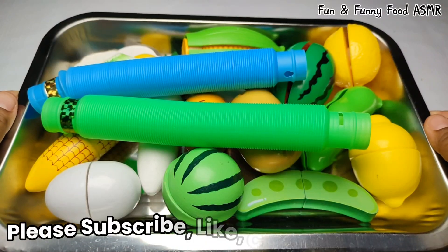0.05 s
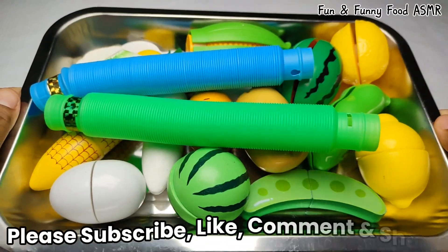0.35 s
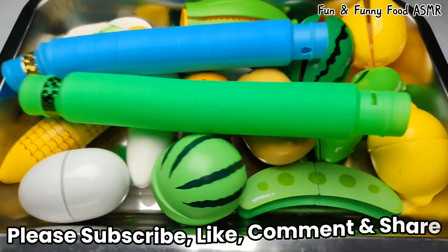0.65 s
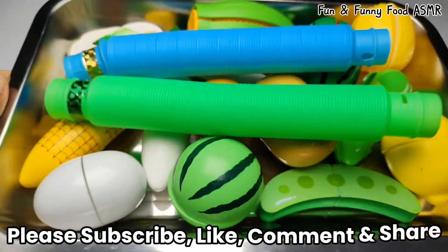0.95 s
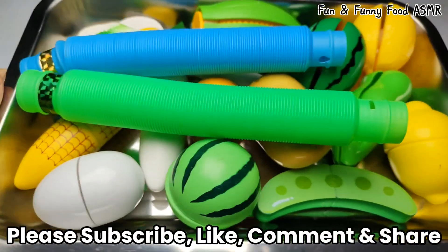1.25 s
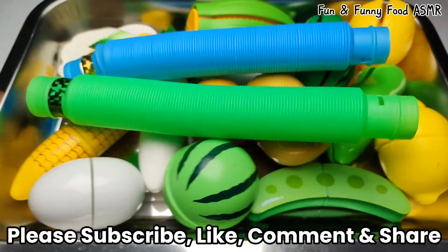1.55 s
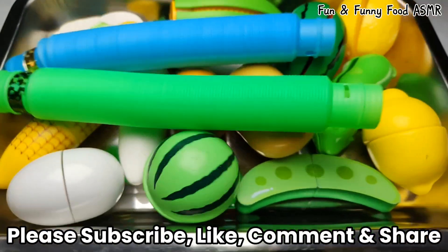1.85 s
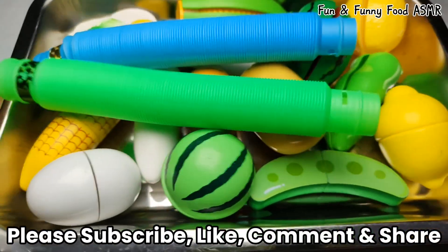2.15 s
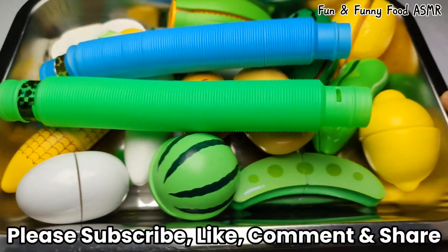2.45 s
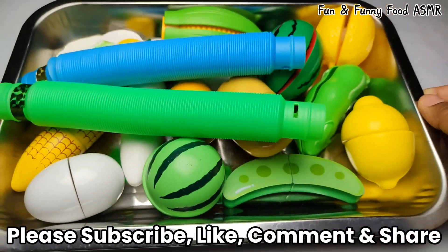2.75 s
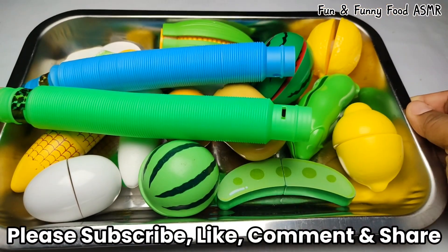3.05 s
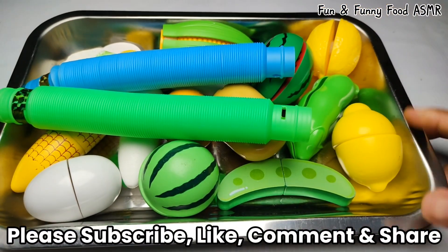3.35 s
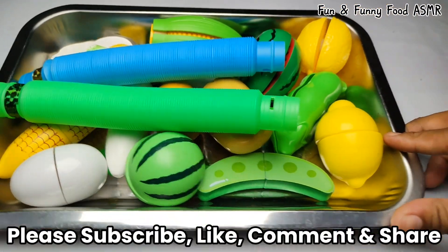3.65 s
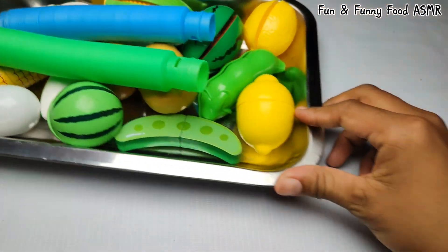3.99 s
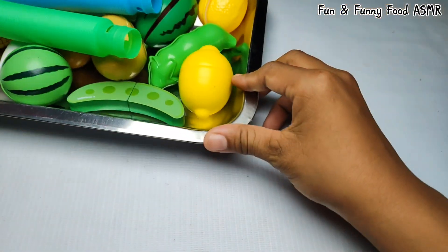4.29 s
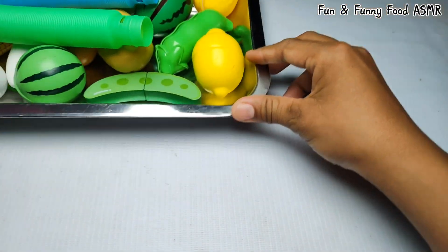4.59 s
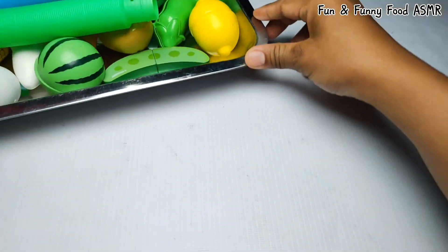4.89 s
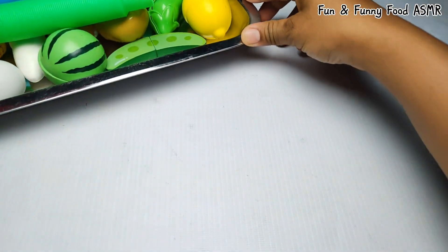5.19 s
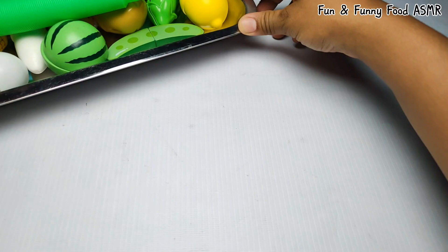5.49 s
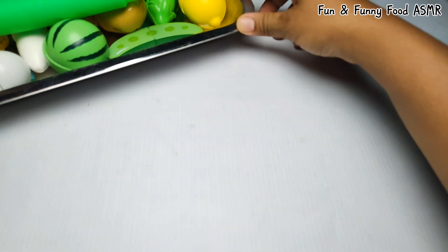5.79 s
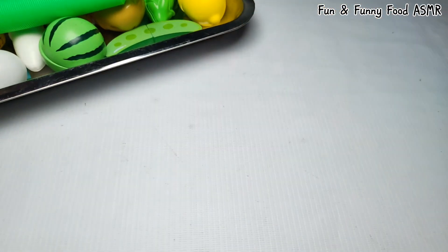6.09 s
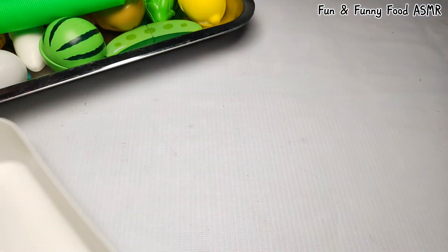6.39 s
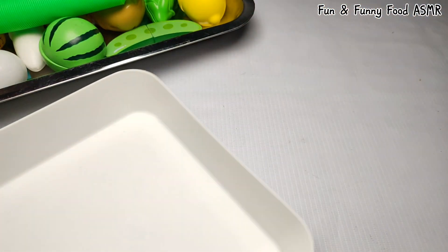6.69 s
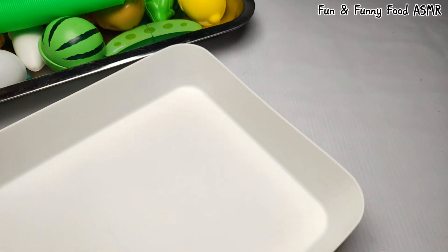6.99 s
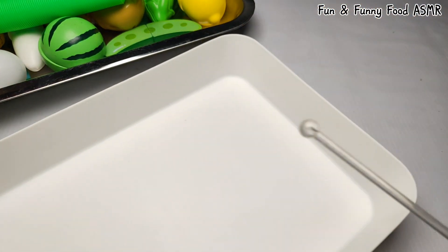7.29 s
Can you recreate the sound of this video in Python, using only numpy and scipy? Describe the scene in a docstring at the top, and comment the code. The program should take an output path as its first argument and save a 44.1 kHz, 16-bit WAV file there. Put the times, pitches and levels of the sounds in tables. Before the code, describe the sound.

Close up in a small room, a heap of hollow plastic toys rattles and clacks against a shaken metal tray. The loud clatter stops and a few soft taps follow. Next the tray scrapes over the tabletop in two pushes, bumping and jogging the toys as it goes. Finally a plastic tray is slid across the table, rasping and groaning quietly over faint background rumble and hiss.

```python
"""Plastic toys in a steel tray

Hollow toys are shaken in a steel tray, close by in a small room, landing in a heap about eight times
a second. Each impact excites the damped modes of a plastic shell and of the steel under it. The toys
settle with a few clicks; the tray is pushed across the table, knocking as it goes, and a plastic tray
slides in after it. Sliding friction makes both scrape; stick-slip makes them sing, rasp and groan."""
import sys
import numpy as np
from scipy import signal
from scipy.fft import rfft, irfft, next_fast_len
from scipy.io import wavfile
from scipy.ndimage import uniform_filter1d

SR = 44100
rng = np.random.default_rng(int(sys.argv[2]) if len(sys.argv) > 2 else 0)


def wav_out(sig):
    """Save sig, one row per channel (or a flat mono array), as 16-bit PCM at SR to the path in sys.argv[1]."""
    wavfile.write(sys.argv[1], SR, np.round(np.clip(np.atleast_2d(sig).T, -1, 1) * 32767).astype(np.int16))


N = 332542
TIME = np.arange(N) / SR
RING_TIME = np.arange(SR // 4) / SR   # time axis of one impulse response


def from_db(db):
    """Amplitude ratio of a level in decibels."""
    return 10 ** (np.asarray(db) / 20)


def rms_one(x):
    """Normalise to unit mean power."""
    return x / np.sqrt(np.mean(x ** 2) + 1e-20)


def energy_one(x):
    """Normalise to unit energy in each channel."""
    return x / np.sqrt(np.sum(x ** 2, axis=-1, keepdims=True))


def peak_one(x):
    """Normalise to unit peak amplitude."""
    return x / np.abs(x).max()


def level_curve(rows):
    """Linear interpolation of (time_s, level_db) rows at every sample."""
    return np.interp(TIME, *np.transpose(rows))


def during(rows):
    """A gate, open while a curve lasts, with 10 ms ramps."""
    return np.clip(np.minimum(TIME - rows[0][0], rows[-1][0] + .02 - TIME) / .01, 0, 1)


def envelope(start_s, hold_s, swell_s, fall_s):
    """Exponential growth up to start_s, a plateau, then exponential decay."""
    exponent = np.minimum((TIME - start_s) / swell_s, (start_s + hold_s - TIME) / fall_s)
    return np.exp(np.clip(exponent, -30, 0))


def onset(rise_s):
    """First-order rise that softens the attack of an impulse response."""
    return 1 - np.exp(-RING_TIME / rise_s)


def on_bins(points, size):
    """Interpolation over log frequency at the bins of a Fourier transform."""
    hz, values = np.transpose(points)
    return np.interp(np.log(np.arange(size // 2 + 1) * SR / size + 1), np.log(hz), values)


def colour(x, spectrum):
    """Minimum-phase filter with a magnitude response of (freq_hz, gain_db) points."""
    size = 2 * next_fast_len(x.shape[-1])
    cepstrum = irfft(np.log(from_db(on_bins(spectrum, size))))[:size // 2]
    response = np.exp(2 * rfft(cepstrum, size) - cepstrum[0])
    return irfft(rfft(x, size) * response)[..., :x.shape[-1]]


def highpass(x, cutoff_hz, order):
    """Butterworth high-pass filter."""
    return signal.sosfilt(signal.butter(order, cutoff_hz, "high", fs=SR, output="sos"), x)


def pan(left_db):
    """Stereo gains for a level difference in favour of the left."""
    return from_db(np.array([[.5], [-.5]]) * left_db)


# Likeness of the sound at left and right: freq_hz, correlation
COHERENCE = [(60, 0.81), (300, 0.93), (640, 0.49), (900, 0.26), (1150, 0.019), (16000, 0.052)]
def spread(pair):
    """Spatial coherence: two independent signals become left and right, alike only in the bass."""
    size = 2 * next_fast_len(pair.shape[-1] // 2 + 2000)
    alike = np.clip(on_bins(COHERENCE, size), -1, 1)
    mid, side = rfft(pair, size)
    return irfft(np.sqrt(1 + alike) * mid + np.sqrt(1 - alike) * side * [[1], [-1]])[:, :pair.shape[-1]]


def drift(per_s):
    """Random fluctuation of unit rms, interpolated between per_s values a second."""
    knots = rng.standard_normal(20000)
    return rms_one(np.interp(TIME * per_s, np.arange(len(knots)), knots))


def wander(per_s, count):
    """Random crossfade among several gains at constant total power."""
    gains = np.array([drift(per_s) for _ in range(count)])
    return gains / np.sqrt(np.sum(gains ** 2, axis=0))


def narrow_noise(hz, width_hz):
    """Narrow-band stereo noise: random quadrature modulation of a carrier whose pitch may move."""
    phase = 2 * np.pi * np.cumsum(hz * np.ones(N)) / SR
    pair = [drift(width_hz) * np.cos(phase) + drift(width_hz) * np.sin(phase) for _ in range(2)]
    return spread(np.array(pair))


def modes(rows):
    """Modal superposition: damped sines (freq_hz, level_db, t60_s), of random strength on each side."""
    out = 0
    for hz, db, t60_s in rows:
        decay = from_db(db + rng.normal(0, 2, (2, 1)) - 60 * RING_TIME / t60_s)
        right_sign = 1 if hz < 1000 else rng.choice([-1, 1])   # low modes reach both sides in phase
        polarity = np.array([[1], [right_sign]]) * rng.choice([-1, 1])
        out += polarity * decay * np.sin(2 * np.pi * hz * RING_TIME)
    return out


def dense_ring(t60_s):
    """High modal overlap: countless modes struck at once merge into decaying noise."""
    return spread(rng.standard_normal((2, len(RING_TIME))) * from_db(-60 * RING_TIME / t60_s))


def contacts(per_s, uneven_db, window_s):
    """Poisson impulses of log-normal size, levelled to unit power over a short window."""
    struck = rng.random(N) < per_s / SR
    clicks = struck * from_db(uneven_db * rng.standard_normal(N)) * rng.choice([-1, 1], N)
    power = np.abs(uniform_filter1d(clicks ** 2, int(window_s * SR)))
    return clicks / np.sqrt(power + 1e-6)


def add(out, start_s, sound):
    """Superpose a sound on the mix at a given time."""
    start = round(start_s * SR)
    out[:, start:start + sound.shape[1]] += sound[:, :N - start]


def excite(force, response):
    """A linear system's output: the excitation convolved with the impulse response."""
    force = np.atleast_2d(force)
    out, active = np.zeros((2, N)), np.flatnonzero(force.any(axis=0))
    if len(active):
        add(out, active[0] / SR, signal.oaconvolve(force[:, active[0]:active[-1] + 1], response, axes=-1))
    return out


# Spectrum of the ambient noise: freq_hz, density_db
AMBIENT_SPECTRUM = [(12, -31.5), (20, -2.5), (72, 2), (182, -20), (310, -18), (607, -32), (802, -25),
                    (1260, -34), (3070, -32.5), (4060, -36.5), (5080, -46.5), (6180, -44.5), (7310, -50),
                    (9400, -47.5), (16000, -74.5)]
# Its dip during the shaking: time_s, gain_db
AMBIENT_DIP = [(0.7, -3), (1.1, -9.5), (2.5, -10.5), (3.1, 0.5)]
# Faint distant glides: start_s, level_db, hold_s, first_hz, last_hz
GLIDES = [(0.155, -50.5, 0.19, 394, 383.5), (0.317, -51, 0.35, 367.6, 305), (3.365, -57.5, 0.21, 807, 708),
          (3.44, -53, 0.11, 520, 510)]
def background():
    """Ambient noise: low rumble and faint hiss, with far tones under slight random modulation."""
    noise = rms_one(colour(spread(rng.standard_normal((2, N))), AMBIENT_SPECTRUM))
    out = from_db(-44.5 + level_curve(AMBIENT_DIP)) * noise
    for start_s, db, hold_s, first_hz, last_hz in GLIDES:
        hz = np.interp(TIME, [start_s, start_s + hold_s], [first_hz, last_hz])
        phase = 2 * np.pi * np.cumsum(hz * (1 + .08 * drift(90))) / SR
        shape = envelope(start_s, hold_s, swell_s=.0175, fall_s=.042)
        out += shape * from_db(db + 2 * drift(32)) * np.sin(phase)
    return out


def room(direct, t60_s=.12, reverb_db=-4.5):
    """Reverberation: near walls return a short tail whose pattern changes as the trays move."""
    walls = [(150, -9.5), (900, -3.5), (4000, -2.0), (14000, 1.0)]   # freq_hz, gain_db
    tails = sum(excite(direct * place, energy_one(colour(dense_ring(t60_s) * onset(.0028), walls)))
                for place in wander(per_s=6, count=4))
    return direct + from_db(reverb_db) * tails


def friction(pushes, steady_db=-40):
    """Amplitude of sliding friction: 1 in a steady push, 0 at rest."""
    return sum(from_db(level_curve(push) - steady_db) * during(push) for push in pushes)


# Spectrum of fine friction hiss: freq_hz, density_db
HISS_SPECTRUM = [(3500, -20), (5500, 3), (6200, 5.5), (7200, -5), (8300, -1.5), (10000, -2), (12500, -10),
                 (15700, -5)]
def slide(pushes, scrape_spectrum, drum_spectrum, scrape_db, hiss_db, drum_db, rough_db, left_db, t60_s):
    """Roughness noise: tiny slips on the table's grain scrape, hiss and drum, all growing with speed."""
    rub, out = friction(pushes), np.zeros((2, N))
    first, last = np.flatnonzero(rub)[[0, -1]]
    grains = contacts(per_s=1000, uneven_db=3.5, window_s=.02) * from_db(rough_db * drift(45)) * (rub > 0)
    # the load wanders among spots of the underside, each ringing the tray in its own way
    slips = sum(excite(grains * load, energy_one(dense_ring(t60_s)))
                for load in wander(per_s=16, count=8))
    slips, rub = slips[:, first:last], rub[first:last]
    scrape = from_db(scrape_db) * rub ** 1.15 * rms_one(colour(slips, scrape_spectrum)) * pan(left_db)
    hiss = from_db(hiss_db) * rub * rms_one(colour(slips, HISS_SPECTRUM))
    drum = from_db(drum_db) * rub ** .3 * rms_one(colour(slips, drum_spectrum)) * pan(3.1)
    add(out, first / SR, scrape + hiss + drum)
    return out


# Speed of the plastic tray, as the level of its friction: time_s, level_db
PLASTIC_FRICTION = [(6.175, -41), (6.19, -42.5), (6.255, -41), (6.44, -34.5), (6.49, -30.5), (6.61, -32.5),
                    (6.68, -31.5), (6.75, -35), (6.8, -31.5), (6.93, -31.5), (6.985, -37), (7.452, -37.5),
                    (7.512, -33.5), (7.54, -39)]
# Spectra of its scrape and its low drumming: freq_hz, density_db
PLASTIC_SCRAPE_SPECTRUM = [(210, -31), (350, -13.5), (450, -4.5), (510, -0.5), (608, -7), (966, -4.5),
                           (1100, -6), (1340, -2.5), (2290, 2), (2910, 2.5), (3400, 2.5), (4290, 3.5),
                           (5050, -12.5), (7000, -22), (9100, -24), (15400, -120)]
PLASTIC_DRUM_SPECTRUM = [(90, -16), (170, 4.5), (280, -8), (370, -5), (700, -63)]
def plastic_slide():
    """Forced vibration: friction drives the well-damped plastic tray through one push."""
    return slide([PLASTIC_FRICTION], PLASTIC_SCRAPE_SPECTRUM, PLASTIC_DRUM_SPECTRUM,
                 scrape_db=-39, hiss_db=-46.5, drum_db=-52, rough_db=.44, left_db=3, t60_s=.035)


# Rasp of the plastic tray's wall: time_s, level_db
RASP_LEVEL = [(6.19, -54), (6.45, -45), (6.56, -38), (6.72, -39), (6.81, -39), (6.93, -38.5), (7.0, -54),
              (7.2, -44), (7.44, -45), (7.5, -36)]
# Groans of its floor: start_s, level_db, hold_s, pitch_hz
FLOOR_GROANS = [(6.196, -41.5, 0.057, 176.3), (6.337, -39, 0.048, 234.4), (6.438, -37.5, 0.099, 269.5),
                (6.515, -41, 0.041, 217), (6.61, -42, 0.045, 278.7), (6.864, -40, 0.12, 185)]
def plastic_stick_slip():
    """Stick-slip sustains modes of the plastic tray: its wall rasps and its floor groans."""
    wall = narrow_noise(2920 * (1 + .04 * drift(25)), width_hz=800)
    rasp = from_db(level_curve(RASP_LEVEL)) * during(RASP_LEVEL) * wall
    groans = sum(from_db(db) * envelope(start_s, hold_s, swell_s=.013, fall_s=.018)
                 * narrow_noise(hz, width_hz=125) for start_s, db, hold_s, hz in FLOOR_GROANS)
    return rasp + groans * pan(7.5)


# Speed of the steel tray, as the level of its friction, one curve a push: time_s, level_db
STEEL_FRICTION = [
    [(3.62, -70), (3.684, -41.5), (3.77, -35), (4.24, -33), (4.372, -39.5), (4.444, -43), (4.45, -63),
     (4.48, -73)],
    [(4.5, -62), (4.542, -47), (4.776, -38), (4.936, -45), (5.116, -41), (5.146, -46), (5.502, -49.5),
     (5.9, -73.5)],
]
# Spectra of its scrape and its low drumming: freq_hz, density_db
STEEL_SCRAPE_SPECTRUM = [(240, -36.5), (400, -11), (473, -11.5), (654, -14.5), (782, -4.5), (1060, -17.5),
                         (1480, -1), (2410, 6), (2820, 9), (3850, 7.5), (5190, -2), (6210, -10),
                         (7000, -14.5), (9100, -102), (15400, -120)]
STEEL_DRUM_SPECTRUM = [(100, 3.5), (220, 5), (300, 16.5), (400, -4), (700, -49)]
def steel_slide():
    """Forced vibration: friction drives the steel tray through two pushes, the second slower."""
    return slide(STEEL_FRICTION, STEEL_SCRAPE_SPECTRUM, STEEL_DRUM_SPECTRUM,
                 scrape_db=-34, hiss_db=-36, drum_db=-52.5, rough_db=1.3, left_db=4, t60_s=.044)


# Chirp of the rim as the hand lets go: start_s, level_db, hold_s
RELEASE_CHIRPS = [(5.956, -51, 0.022)]
def steel_stick_slip():
    """Stick-slip sustains a mode of the steel rim: it sings in the slow push and chirps on release."""
    rim = narrow_noise(2820 * (1 + .022 * drift(14)), width_hz=400)
    song = from_db(-44 + 3.5 * drift(30)) * friction(STEEL_FRICTION[1:]) ** .8 * rim
    chirp_gain = sum(from_db(db) * envelope(start_s, hold_s, swell_s=.013, fall_s=.018)
                     for start_s, db, hold_s in RELEASE_CHIRPS)
    return song + chirp_gain * narrow_noise(2950, width_hz=800)


# Brief slips of toys and trays: start_s, scrape_db, hiss_db, fall_s
SHORT_SLIPS = [(0.307, -64, -59, 0.003), (0.368, -51.5, -51, 0.085), (0.380, -41.5, -40, 0.0018),
               (0.462, -34.5, -34, 0.0056), (3.294, -45, -48.5, 0.029), (3.597, -43, -43, 0.0007),
               (4.222, -24, -40, 0.015), (4.247, -21.5, -34, 0.006), (5.047, -32.5, -34, 0.0093),
               (5.117, -37, -45, 0.009), (6.675, -28, -37, 0.019), (6.783, -21, -43, 0.016)]
def scuffs():
    """Transient friction: a short slip gives a burst of scrape and hiss that dies away."""
    scrape_gain, hiss_gain = np.zeros((2, N))
    for start_s, scrape_db, hiss_db, fall_s in SHORT_SLIPS:
        shape = envelope(start_s, hold_s=.002, swell_s=.003, fall_s=fall_s)
        scrape_gain += from_db(scrape_db) * shape
        hiss_gain += from_db(hiss_db) * shape
    grain = spread(rng.standard_normal((2, N)))
    scrape = scrape_gain * rms_one(colour(grain, STEEL_SCRAPE_SPECTRUM)) * pan(1.7)
    return scrape + hiss_gain * rms_one(colour(grain, HISS_SPECTRUM))


# Resonances of the steel: freq_hz, bandwidth_hz, peak_db
STEEL_RESONANCES = [(314, 74, -15), (831.4, 29, 0), (913, 27, 0.5), (1396, 84, -7.5), (1627, 49, -5.5),
                    (2010, 58, -1), (2380, 26, -10), (2807, 30, -2.5), (3820, 15, -5), (3984, 45, -5),
                    (4900, 26, -14), (5060, 28, -18), (6218, 110, -20), (7950, 200, -22), (9800, 170, -26),
                    (10915, 120, -29), (14175, 150, -34.5), (15390, 200, -37)]
# Modes of the tray's short clang: freq_hz, level_db, t60_s
CLANG_MODES = [(774, 3.5, 0.021), (827, -3.5, 0.06), (889, -4, 0.064), (997.5, -0.5, 0.04)]
# Spectrum of a struck plastic shell: freq_hz, density_db
SHELL_SPECTRUM = [(53, -71.5), (90, -29), (165, -15), (303, -9.5), (470, -11.5), (620, -12.5), (858, -3),
                  (1100, -8), (1410, -1.5), (3080, -4), (3900, -8.5), (4600, -20), (5410, -32.5),
                  (6160, -19), (7020, -44.5), (8000, -35.5), (16000, -47.5)]
def toy_on_steel(shell_t60_s, steel_db, pitch_hz, ring_db):
    """Impact excites both bodies: the shell knocks and rings at its pitch, the tray clangs and rings."""
    # a resonance's bandwidth sets its decay time and, for a given peak, its starting amplitude
    steel = modes([(hz, db + 20 * np.log10(width_hz), np.log(1000) / (np.pi * width_hz))
                   for hz, width_hz, db in STEEL_RESONANCES])
    shell = colour(dense_ring(shell_t60_s), SHELL_SPECTRUM)
    ring = modes([(pitch_hz, 0, .028), (pitch_hz * 1.08, -3, .022)])
    sound = energy_one(shell) + from_db(steel_db) * energy_one(steel) + from_db(ring_db) * energy_one(ring)
    sound += from_db(-12.5) * energy_one(modes(CLANG_MODES))
    return energy_one(highpass(sound, 125, order=3))   # the impact sound keeps little below 125 Hz


def glint(low_hz=4990, high_hz=14900, db_per_octave=-8.5, t60_s=.088, count=9):
    """The point of impact selects the modes: each spot of a shell rings its own few high ones."""
    pitches = low_hz * (high_hz / low_hz) ** ((np.arange(count) + rng.random(count)) / count)
    return energy_one(modes([(hz, db_per_octave * np.log2(hz / low_hz), t60_s) for hz in pitches]))


# Modes of the table, the tray floor and the whole tray flexing: freq_hz, level_db, t60_s
TABLE_MODES = [(98, 11, 0.099), (130, 13, 0.13)]
FLOOR_MODES = [(285.2, -2.5, 0.16), (313, 3, 0.11), (351, -13, 0.14), (507, -14, 0.15)]
FLEX_MODES = [(183, -0.5, 0.18), (233, 14.5, 0.036)]
# Bumps of the trays on the table: start_s, knock_db, boom_db, thud_db, boom_pitch_ratio
TRAY_BUMPS = [(3.196, -37, -16, -42, 1.04), (3.747, 7, 6, -30, 1.11), (4.179, 7.5, -2, -26, 1.08),
              (4.42, 5.5, -2, -32, 0.98), (4.457, -1.5, 1.5, -10, 0.97), (4.634, 6, 5, 4, 0.94),
              (4.691, -6, -14, -20, 0.86), (4.725, -27, -10.5, -7.5, 1.08), (4.843, -0.5, -35, -29, 1.3),
              (4.891, -7.5, 0.5, -37, 0.99), (5.884, -21.5, -35, -36, 0.94), (6.115, -23, -15, -42, 0.93),
              (6.701, -1, -11, -23, 0.91)]
def bumps():
    """Free vibration after a blow: the table thuds, the tray booms and flexes, the toys knock on it."""
    out = np.zeros((2, N))
    for start_s, knock_db, boom_db, thud_db, pitch_ratio in TRAY_BUMPS:
        # the floor's boom shifts in pitch from bump to bump
        floor = modes([(hz * pitch_ratio, db, t60_s) for hz, db, t60_s in FLOOR_MODES])
        boom = from_db(boom_db) * energy_one(highpass(floor, 140, order=2))
        thud = from_db(thud_db) * energy_one(modes(TABLE_MODES))
        flex_db = -18.5 + 4.3 * boom_db   # only hard blows flex the whole tray
        flex = from_db(flex_db) * energy_one(highpass(modes(FLEX_MODES), 140, order=2))
        knock = from_db(knock_db) * toy_on_steel(shell_t60_s=.16, steel_db=-26, pitch_hz=690, ring_db=-14)
        add(out, start_s, thud + flex + boom + knock)
    return out


# Modes of a tapped shell: pitch_ratio, level_db, t60_s
TAP_PARTIALS = [(1.0, 7, 0.03), (1.1, -4.5, 0.028), (0.63, -8, 0.033), (1.62, -14.5, 0.041)]
# Spectrum of its dry knock: freq_hz, density_db
KNOCK_SPECTRUM = [(300, -7), (800, -5), (1400, 0), (3200, 1), (4600, -14), (9000, -21), (15000, -38)]
# Light taps after the shaking: start_s, peak_db, pitch_hz, ring_re_knock_db
LIGHT_TAPS = [(2.907, -25.5, 1350, -11), (2.942, -31, 2200, -8), (2.997, -25, 1785, 1),
              (3.022, -28, 997, -0.5), (3.194, -21, 1865, -7.5), (3.201, -36, 2360, 12),
              (3.293, -32.5, 1940, -1), (3.431, -39, 3340, 0), (3.544, -31.5, 2500, -2),
              (3.725, -15, 1470, -9), (4.429, -17, 1550, -4), (4.514, -22, 2676, 4),
              (4.538, -28.5, 2650, -1), (5.925, -36, 1050, -6)]
def taps():
    """Natural frequencies: a light tap gives a dry knock and the clear ring of one hollow shell."""
    out = np.zeros((2, N))
    for start_s, peak_db, hz, ring_db in LIGHT_TAPS:
        ring = sum(from_db(db - 60 * RING_TIME / t60_s) * np.sin(2 * np.pi * hz * ratio * RING_TIME)
                   for ratio, db, t60_s in TAP_PARTIALS)
        knock = energy_one(colour(dense_ring(t60_s=.041), KNOCK_SPECTRUM))
        tap = onset(.002) * (knock + from_db(ring_db) * energy_one(ring))
        add(out, start_s, from_db(peak_db) * peak_one(tap))
    return out


# Modes of a shell struck on its edge: freq_hz, level_db, t60_s
EDGE_MODES = [(1870, -1, 0.039), (2093, -8, 0.056), (2437, -6, 0.017), (2610, -3.5, 0.02),
              (3160, -6.5, 0.03), (3630, -0.5, 0.0183), (3900, 2.5, 0.017), (4950, -6, 0.009)]
# Edge-on collisions of two toys: start_s, level_db, low_hz, high_hz
EDGE_HITS = [(0.7119, 5, 1400, 4500), (0.7255, 14, 1400, 4650), (1.3909, 6, 1400, 5500),
             (2.2084, 18.5, 1400, 5500), (2.5555, 11.5, 900, 5900), (2.84, 5, 1400, 2400),
             (4.447, 6.5, 2220, 3050)]
def cracks():
    """Hard contact excites high, heavily damped modes: shell on shell gives a dry, pitched crack."""
    out, rise = np.zeros((2, N)), onset(.0012)
    for start_s, db, low_hz, high_hz in EDGE_HITS:
        band = signal.butter(7, [low_hz, high_hz], "band", fs=SR, output="sos")
        crack = energy_one(rise * modes(EDGE_MODES)) + .72 * energy_one(rise * dense_ring(t60_s=.019))
        add(out, start_s, from_db(db) * energy_one(signal.sosfilt(band, crack)))
    return out


# Single sharp contacts of toy and tray: start_s, peak_db, snap_re_peak_db, pitch_hz
SHARP_HITS = [(0.607, -34, -35, 955), (0.636, -11, -37, 1910), (0.691, -17.5, -29, 1890),
              (0.699, -13.5, -21, 1730), (0.710, -3, -19.5, 900), (0.726, -12.5, -22, 2240),
              (0.75, -20, -34, 840), (0.803, 0, -18.5, 926), (0.816, -3.5, -36, 840),
              (0.94, -0.5, -32.5, 850), (0.952, -3, -25, 1500), (0.965, -3.5, -8.5, 850),
              (1.084, -7.5, -16.5, 1930), (1.176, -1.5, -14.5, 876), (1.189, 1.5, -21.5, 1430),
              (1.219, -5.5, -21, 910), (1.318, -5, -16.5, 947), (1.328, -4, -25, 1890),
              (1.371, -22.5, -26, 2390), (1.391, 1, -17.5, 830), (1.4, -5, -10.5, 1700),
              (1.49, -13.5, -14.5, 930), (1.521, -0.5, -15, 943), (1.537, -2.5, -30, 1977),
              (1.614, -3, -25, 1690), (1.636, 3, -17.5, 831), (1.65, -19, -18.5, 1470),
              (1.686, -11, -24, 846), (1.785, -13, -21, 920), (1.861, 2, -18.5, 800),
              (1.875, -4.5, -13.5, 1670), (1.993, -7, -20.5, 823), (2.104, -4, -16.5, 877),
              (2.117, -2.5, -12.5, 2000), (2.209, -9, -12, 2010), (2.236, -19.5, -25, 873),
              (2.313, -7, -30, 860), (2.339, 1, -17.5, 860), (2.357, -16, -6, 1400), (2.393, -4, -19, 903),
              (2.451, -6, -31, 1940), (2.485, -12, -24, 1520), (2.527, -14, -25, 980), (2.555, 2, -19, 793),
              (2.564, -6.5, -19.5, 1550), (2.6, -6.5, -19, 2460), (2.701, -11.5, -50, 1714),
              (2.787, -14, -34, 1500), (2.807, -7.5, -20, 957), (4.843, -18.5, -28, 2110)]
def clacks():
    """Contact compliance: thin plastic yields, so each knock swells briefly under a bright snap."""
    out = np.zeros((2, N))
    crackle_spectrum = [(5000, 3.5), (10000, -2.0), (12800, -9.0), (15000, -3.5)]   # freq_hz, gain_db
    for start_s, peak_db, snap_db, hz in SHARP_HITS:
        ring_db = -3.5 - .086 * peak_db   # lighter contacts ring more purely
        knock = onset(.0035) * toy_on_steel(shell_t60_s=.036, steel_db=-12, pitch_hz=hz, ring_db=ring_db)
        body = peak_one(highpass(knock, 290, order=2))   # a lone toy radiates little bass
        treble = highpass(dense_ring(t60_s=.034), 4700, order=4)
        crackle = energy_one(colour(treble, crackle_spectrum))
        snap = peak_one(onset(.0016) * (crackle + glint()))
        add(out, start_s, from_db(peak_db) * (body + from_db(snap_db) * snap))
    return out * pan(1)


# Loose jostling as the tray is shaken and set down: time_s, level_db
JOSTLE_LEVEL = [(0.645, -27), (0.69, -45), (0.76, -22.5), (0.95, -25), (2.58, -25), (2.76, -34.5),
                (2.9, -56), (3.0, -44.5), (3.05, -85)]
# The heap lands at each turn of the tray: start_s, level_db, tumble_s, rebound_re_landing_db
HEAP_LANDINGS = [(0.813, -15.5, 0.026, -5.5), (0.93, -13, 0.047, -2), (1.079, -10.5, 0.017, -12.5),
                 (1.18, -14.5, 0.07, -18), (1.336, -24, 0.0098, -18), (1.406, -13, 0.022, 0.5),
                 (1.492, -19, 0.057, -4.5), (1.615, -13, 0.047, -6.5), (1.77, -10.5, 0.012, -9),
                 (1.866, -12, 0.016, -0.5), (1.991, -14, 0.027, -7), (2.094, -10.5, 0.021, -13),
                 (2.188, -22.5, 0.057, 0), (2.339, -10.5, 0.014, -8.5), (2.452, -15, 0.035, -3),
                 (2.56, -17, 0.03, -13.5), (2.654, -23, 0.016, -25), (2.812, -21, 0.0046, -19)]
def rattle(toy_count=24, swell_s=.011, fall_s=.023, rebound_s=.056, chatter_s=.009):
    """Incoherent summation: landings and rebounds are swarms of random impacts whose powers add."""
    shaking = during(JOSTLE_LEVEL)
    power = from_db(level_curve(JOSTLE_LEVEL)) ** 2 * shaking
    for start_s, db, tumble_s, rebound_db in HEAP_LANDINGS:
        power += (from_db(db) * envelope(start_s, tumble_s, swell_s, fall_s)) ** 2
        power += (from_db(db + rebound_db) * envelope(start_s + rebound_s, tumble_s, swell_s, fall_s)) ** 2
    clicks = contacts(per_s=450, uneven_db=4.6, window_s=.012) * np.sqrt(power) * shaking
    # one toy chatters briefly, then another
    active_toy = rng.integers(0, toy_count, N)[(TIME / chatter_s).astype(int)]
    out = np.zeros((2, N))
    for toy, hz in enumerate(np.geomspace(1300, 3100, toy_count)):
        knock = toy_on_steel(shell_t60_s=.047, steel_db=-7.5, pitch_hz=hz, ring_db=-8)
        high_modes = from_db(rng.normal(-28, 4.5)) * glint()
        out += excite(clicks * (active_toy == toy), knock + high_modes)
    return out


# Radiation of the tray to the two sides: freq_hz, left_minus_right_db
TRAY_DIRECTIVITY = [(100, 5), (300, 1), (600, 6), (870, 4.5), (1100, 2.5), (1500, 5.5), (2800, 1.5),
                    (5000, -0.5), (16000, -4)]
def radiate(x):
    """Directivity: the tray sends its low and middle frequencies mostly to the left."""
    return np.array([colour(side, [(hz, share * db) for hz, db in TRAY_DIRECTIVITY])
                     for side, share in zip(x, (.5, -.5))])


def scene():
    """Superposition: impacts and friction sound in the room, joined by dry cracks and the background."""
    sliding = steel_slide() + plastic_slide()
    impacts = radiate(rattle() + clacks() + taps() + bumps())
    rubbing = scuffs() + sliding + steel_stick_slip() + plastic_stick_slip()
    return room(impacts + rubbing) + cracks() + background()


def record(dry, cutoff_hz=15900):
    """Soft saturation rounds the loudest peaks, and a steep low-pass limits the bandwidth."""
    rounded = 1.188 * np.tanh(dry / 1.227)
    return signal.sosfilt(signal.ellip(12, .1, 70, cutoff_hz, fs=SR, output="sos"), rounded)


dry = scene()
out = record(dry)
wav_out(out)
```